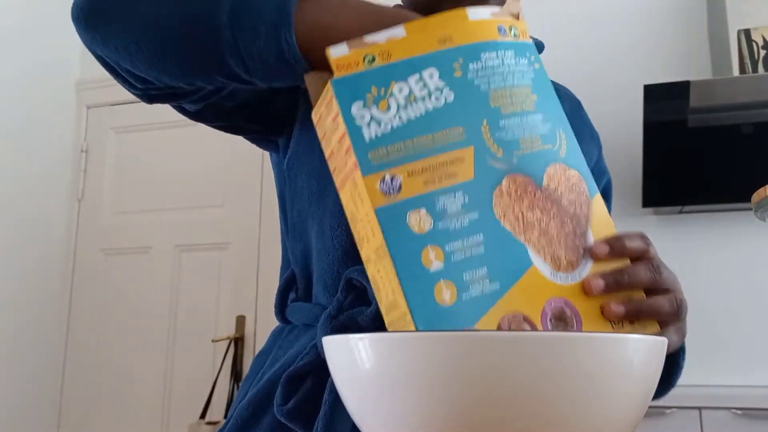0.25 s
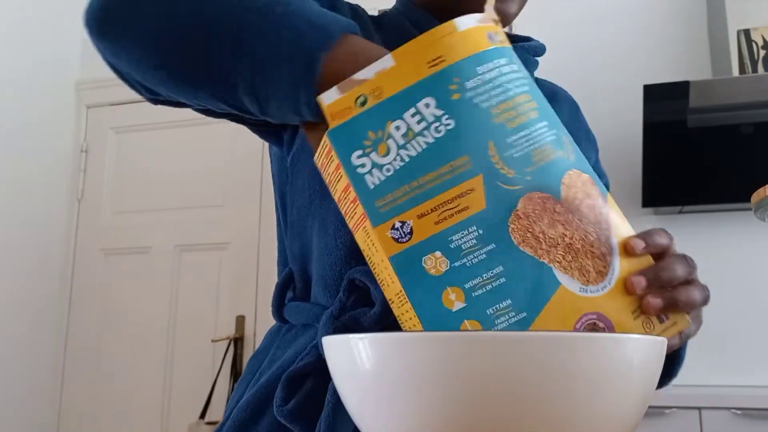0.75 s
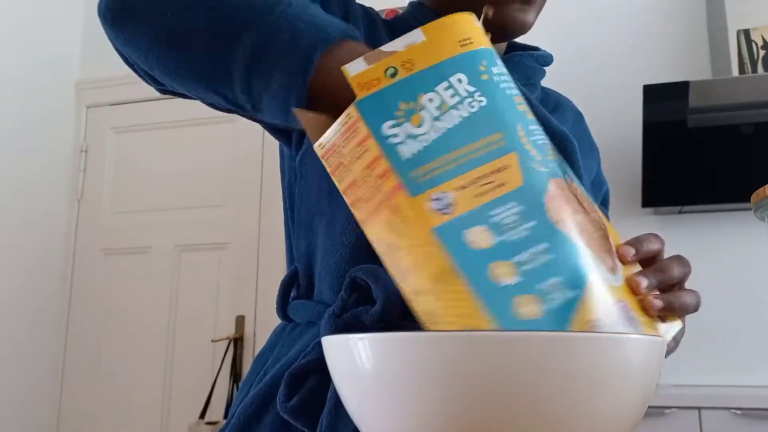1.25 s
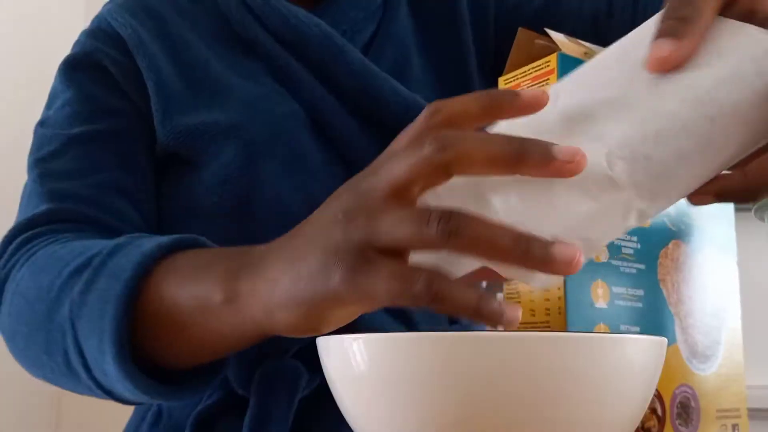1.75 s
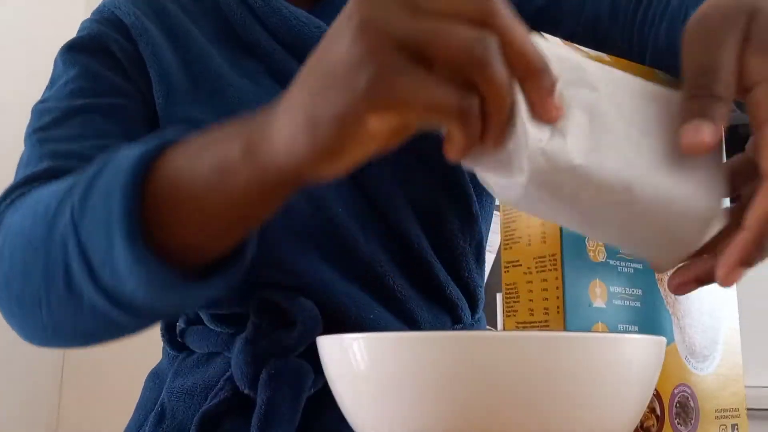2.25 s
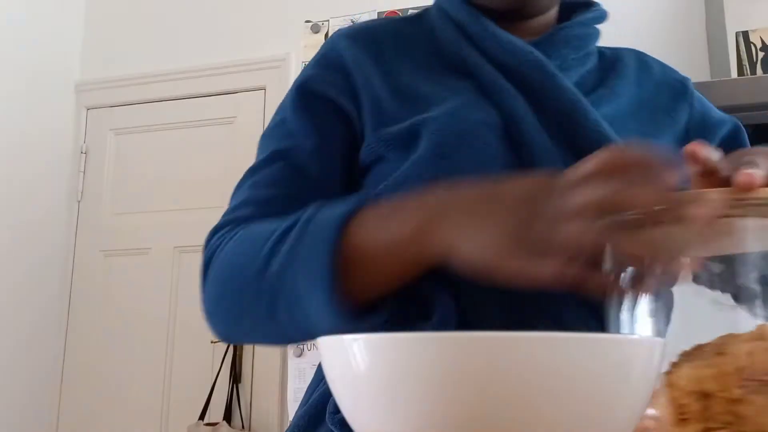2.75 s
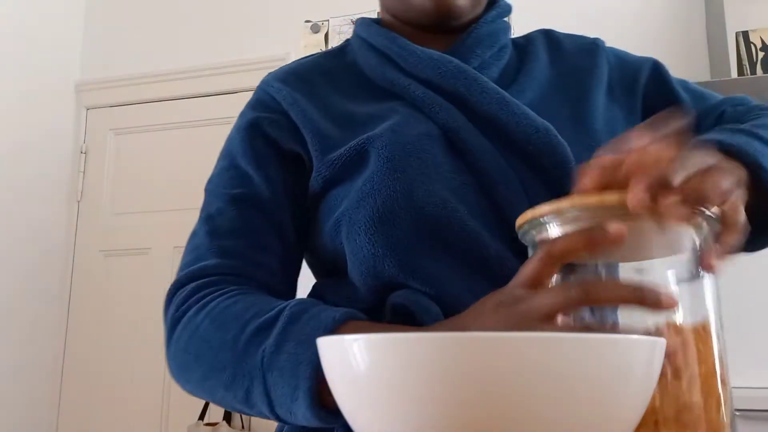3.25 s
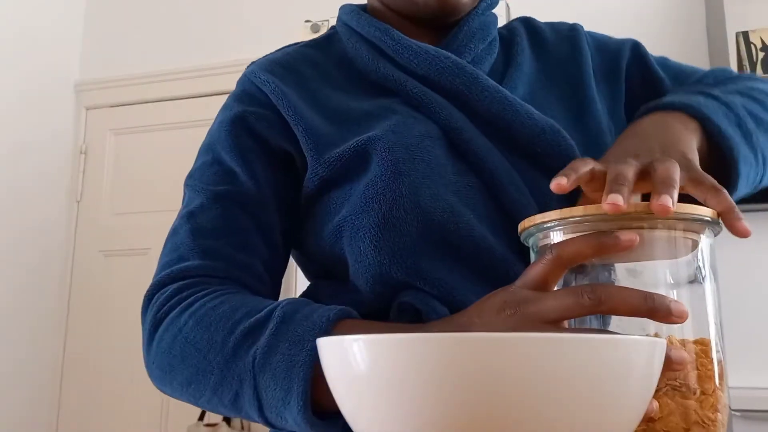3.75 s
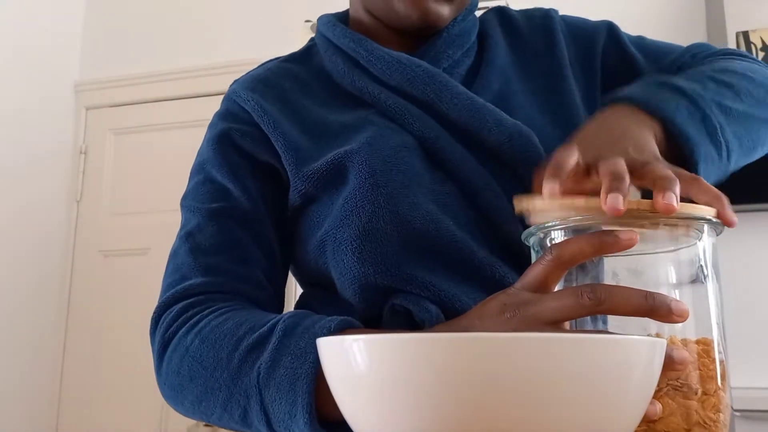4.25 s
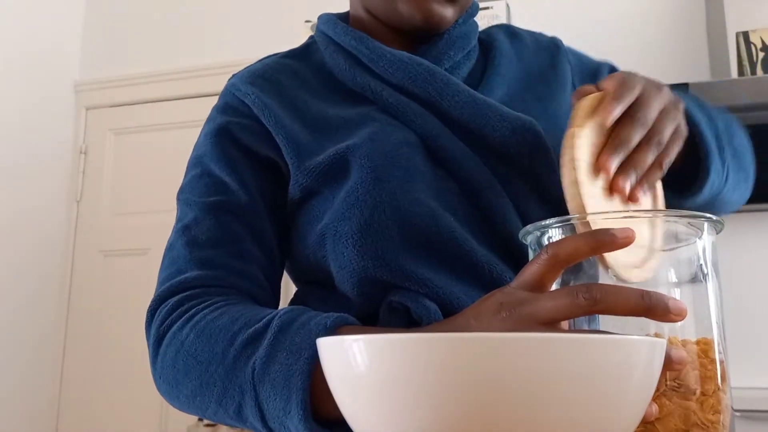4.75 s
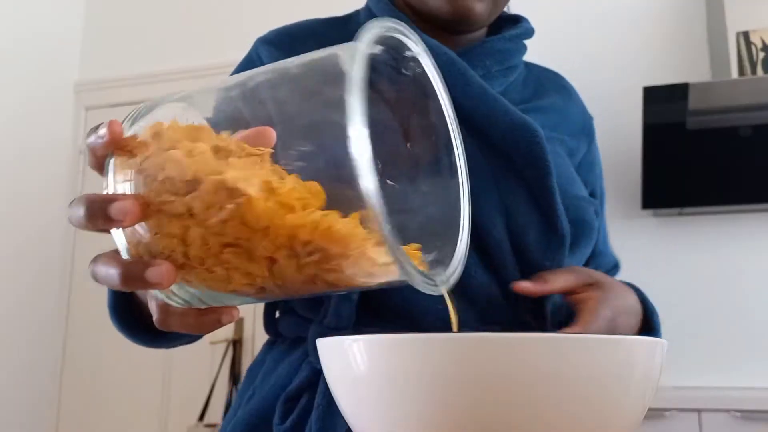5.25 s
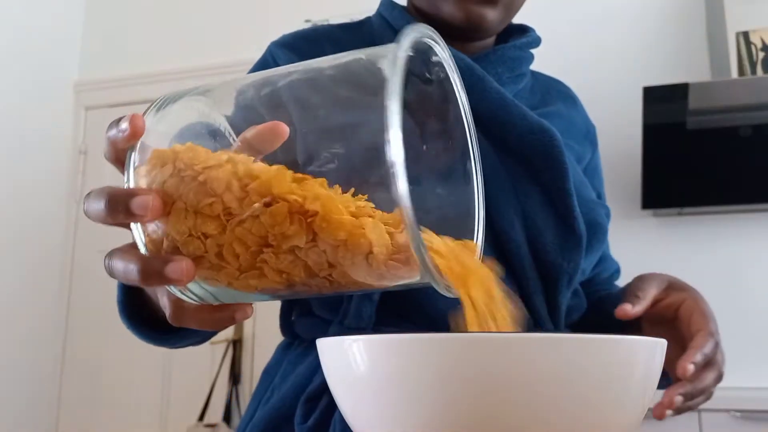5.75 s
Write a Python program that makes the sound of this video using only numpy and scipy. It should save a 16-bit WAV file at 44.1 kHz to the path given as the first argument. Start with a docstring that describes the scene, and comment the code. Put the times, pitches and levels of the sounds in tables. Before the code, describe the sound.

In an echoing kitchen, a hand rummages softly in a cardboard cereal box, with dull hollow bumps. A hard cut brings louder, sharp crackling of a paper wrapper. Another cut: a glass jar thuds and drags on the worktop, gets hard knocks, and its wooden lid pops off with a brief glassy ring. Finally dry flakes slide down the glass and patter into a ceramic bowl with faint clinks. Close stereo microphones.

```python
"""Breakfast sounds in an echoing kitchen

Four parts with hard cuts: a hand rummages in a cardboard cereal box; a paper wrapper crinkles;
a glass jar is slid and knocked on the worktop and its wooden lid pops off; dry flakes slide into a ceramic bowl.
Paper and flakes are clouds of random clicks through filters, knocks are short tone swells with noise slaps,
glass and bowl are struck resonators."""
import sys
import numpy as np
from scipy import signal
from scipy.fft import rfft, irfft, next_fast_len
from scipy.io import wavfile
from scipy.ndimage import uniform_filter1d

SR = 44100
rng = np.random.default_rng(int(sys.argv[2]) if len(sys.argv) > 2 else 0)


def transcribe(signal):
    """Save signal, clipped to [-1, 1], as a 16-bit WAV file at the path in sys.argv[1]."""
    frames = np.atleast_2d(signal).T
    limited = np.clip(frames, -1, 1)
    pcm = np.round(limited * 32767).astype(np.int16)
    wavfile.write(sys.argv[1], SR, pcm)


N = 265041

# the four parts: start_s, end_s
PARTS = [(0, 1.567), (1.58, 2.581), (2.581, 4.777), (4.797, 6.02)]
# single creases that crack: start_s, level_db
SNAPS = [(0.1045, -21), (0.1453, -23), (0.3548, -19), (0.395, -23.5), (1.3174, -17), (1.4697, -20.5),
         (1.669, -23), (1.7373, -19.5), (1.7907, -12), (1.8488, -10), (1.8733, -8.5), (1.901, -11),
         (1.9355, -18), (1.947, -18), (1.97, -19.5), (1.992, -18.5), (2.0339, -9.5), (2.064, -19.5),
         (2.0847, -13.5), (2.103, -14), (2.1176, -7.5), (2.1605, -10), (2.177, -16), (2.2064, -9),
         (2.222, -7.5), (2.2729, -13), (2.407, -8.5), (2.493, -20.5), (2.524, -24)]
# whole panels that buckle with a dull pop: start_s, level_db
POPS = [(0.4552, -21), (0.943, -25.5), (1.67, -20.5), (1.7384, -17), (2.289, -26.5), (2.367, -22)]
# dull blows on cardboard, worktop and lid: start_s, level_db, pitch_hz, contact_ms
KNOCKS = [(0.729, -21, 504, 2.5), (0.839, -9.5, 499, 1.53), (1.26, -9.5, 492, 1.18),
          (1.333, -11.5, 299, 3.1), (1.341, -10.5, 480, 1.2), (1.35, -11.5, 400, 1.25),
          (1.367, -18.5, 311, 3.2), (2.582, -13, 405, 0.9), (2.658, -25.5, 432, 3.5),
          (2.769, -27.5, 132, 5.6), (2.901, -35.5, 119, 7.8), (3.266, -6.5, 482, 1.4),
          (3.277, -12, 560, 0.76), (3.37, -3.5, 422, 1.96), (3.379, -2.5, 452, 0.85),
          (3.408, -1, 505, 0.98), (4.1, -26, 410, 2.9), (4.264, -7, 463, 1.46), (4.2759, -14.5, 457, 2.2),
          (4.539, -26, 500, 3.7), (4.585, -9.5, 473, 2.9), (4.598, -7, 500, 1.3), (4.6188, -6, 700, 0.46)]
# hard edge meeting the worktop: start_s, level_db
TICKS = [(3.266, -22)]
# rumble of the dragged jar and the lid worked loose: time_s, level_db
DRAG = [(2.58, -32), (2.75, -40), (3.02, -49.5), (3.12, -41.5), (3.22, -55), (3.28, -41), (3.42, -30.5),
        (3.55, -57.5), (4.2, -74), (4.28, -45), (4.52, -55), (4.62, -37.5), (4.78, -37.5)]
# brighter slips of the jar: start_s, hold_s, level_db
SCRAPES = [(3.09, 0.052, -67.5), (3.288, 0.04, -50.5), (3.37, .05, -55.5), (4.595, 0.014, -49)]
# air popping as the seal lets go: start_s, length_s, level_db, from_hz, to_hz
LID_POP = (4.551, .024, -13, 270, 640)
# hand in the box, as cardboard rustle: time_s, level_db
RUMMAGE = [(0, -43.5), (.08, -43.5), (.17, -38.5), (.22, -54), (.33, -49.5), (.37, -45.5), (.52, -30.5),
           (.57, -41.5), (.68, -33.5), (.82, -36.5), (.93, -42), (1.0, -37), (1.1, -43.5), (1.2, -36),
           (1.33, -33), (1.42, -34), (1.47, -33.5), (1.57, -46)]
# hands on the wrapper, as rustle: time_s, level_db
CRINKLE = [(1.58, -49), (1.77, -46.5), (1.86, -30.5), (1.92, -36), (2.0, -29.5), (2.12, -32.5), (2.22, -38),
           (2.3, -39.5), (2.45, -50), (2.58, -58)]
# crackle under a -40 dB rustle, and how far it follows the rustle: level_db, swing_share
BOX_CRACKLE = (-56, 0.83)
WRAPPER_CRACKLE = (-49, 0.94)
# flakes sliding along the glass: time_s, level_db
POUR = [(4.82, -40), (4.98, -46.5), (5.13, -49.5), (5.38, -45), (5.47, -41.5), (5.66, -37), (6.01, -41)]
# jar wall singing under the flakes: time_s, level_db
GLASS_HUM = [(4.8, -68), (5.39, -71), (5.47, -59), (6.0, -62)]
# flakes landing in the bowl: time_s, level_db
FALL = [(5.69, -51), (5.712, -39.5), (5.77, -35.5), (5.92, -39.5), (6.01, -50)]
# flakes striking bare ceramic: start_s, strike_db
CLINKS = [(5.70, -47), (5.768, -38), (5.872, -42), (5.915, -38.5), (5.962, -42)]

# spectrum shapes, only relative level counts: freq_hz, level_db_per_hz
BOX_SPECTRUM = [(50, -34.5), (130, -16.5), (280, -7), (523, -1.5), (900, -8), (2900, -17.5), (4200, -28),
                (8000, -31.5)]
WRAPPER_SPECTRUM = [(50, -29), (140, -15), (583, 0.5), (1000, -2.5), (2820, -9), (4000, -20), (8000, -59)]
CRACKLE_SPECTRUM = [(1470, -38), (2500, -6.5), (2920, -8), (4820, -10), (12000, -10), (15800, -13.5)]
WORKTOP_SPECTRUM = [(50, -27.5), (118, -12), (187, -10), (456, -4), (688, -23), (1600, -32.5), (3000, -47)]
SCRAPE_SPECTRUM = [(880, -42.5), (1500, -5.5), (2740, -9), (3710, -4.5), (4180, -5.5), (15800, -22.5)]
FLAKE_SPECTRUM = [(800, -53), (1700, -24.5), (2750, -7), (3300, -12.5), (5900, -14.5), (12100, -2),
                  (15800, -5.5)]
LANDING_SPECTRUM = [(150, -22), (350, -11.5), (700, -14), (1500, -7.5), (3000, -4.5), (5000, -12)]
AIR_SPECTRUM = [(50, -27.5), (100, 2.5), (190, 0.5), (450, -3), (700, -22), (1000, -14), (16000, -56.5)]
# push of wood on glass: freq_hz, level_db_per_hz
RIM_SPECTRUM = [(20, -7.5), (1500, -10), (3200, -9.5), (6000, -55)]
# noisy slap of a hard contact: freq_hz, level_db_per_hz
SLAP_SPECTRUM = [(100, -7), (300, 5), (1000, -6.5), (2200, -29.5), (4500, -56)]

# ringing modes: freq_hz, level_db, t60_s
JAR_MODES = [(1013, -18, 0.1), (2417, -29, 0.045), (3750, -37, .05), (6200, -43.5, 0.03),
             (7480, -42.5, 0.046), (9900, -39, 0.048)]
BOWL_MODES = [(850, -11, .15), (2176, 0, .4), (3940, -12, .4)]
# reverberation of the room: freq_hz, t60_s
KITCHEN_T60 = [(250, 0.67), (700, 0.85), (2000, 0.66), (5000, 0.62), (12000, 0.43)]
# microphone pair: freq_hz, colour_db, extra_width_db
MIC = [(280, -0.48, -1.5), (1190, 1.84, 0.5), (4300, -2, 5.5), (8400, -2, 3.5), (12500, 0.7, -0.5)]

AIR_DB = -67
SNAP_BODY_DB = -9.5   # the body's answer, relative to the crack
SLAP_DB = -8.5   # relative to the knock, at 1 ms contact
LID_LOOSE_S = 4.555
RING_SHUT_DB, RING_OPEN_DB = -24, -4.5   # glass relative to a 1 ms blow, lid seated and loose
DRAG_HISS_DB = -33.5   # faint scrape relative to the rumble
SCRAPE_RISE_DB_PER_S, SCRAPE_FALL_DB_PER_S = 406, 177.5
SING_DB, SING_FADE_DB_PER_S = -69, 22   # high glass modes from the first slide, fading
NEAR_DB, NEAR_DECAY_S, NEAR_SHIFT_S = -7, 0.0033, 0.06   # close bounces; time between patterns
CUTOFF_HZ = 16984


def amp(db):
    """dB to gain."""
    return 10 ** (np.asarray(db) / 20)


def rms_one(x):
    """Scales to rms 1."""
    return x / np.sqrt(np.mean(x ** 2) + 1e-20)


def levels(rows):
    """Gain curve over time from a time_s, level_db table."""
    time_s, level_db = np.transpose(rows)
    return amp(np.interp(np.arange(N) / SR, time_s, level_db))


def rows_between(table, start_s, end_s):
    """Table rows whose first column lies in the span."""
    return [row for row in table if start_s <= row[0] < end_s]


def at_hz(points, hz):
    """Reads a table on a log-frequency axis."""
    points = np.array(points)
    return np.interp(np.log(hz + 1), np.log(points[:, 0]), points[:, 1])


def fold(x, response):
    """Convolution, cut to length."""
    return signal.oaconvolve(np.atleast_2d(x), np.atleast_2d(response), axes=1)[:, :N]


def pulse(spectrum):
    """Minimum-phase impulse response of a spectrum, energy 1, by folding its cepstrum."""
    log_gain = at_hz(spectrum, np.fft.rfftfreq(4096, 1 / SR)) * np.log(10) / 20
    cepstrum = irfft(log_gain)
    cepstrum[1:2048] *= 2
    response = irfft(np.exp(rfft(cepstrum[:2049], 4096)))[:2048]
    return response / np.sqrt(np.sum(response ** 2))


def ring(clicks, modes):
    """Clicks excite two-pole resonators, one per mode, each dying by its t60."""
    out = 0
    for hz, db, t60_s in modes:
        r = amp(-60 / (t60_s * SR))
        w = 2 * np.pi * hz / SR
        gain = amp(db) * np.sin(w)
        out = out + signal.lfilter([0, gain], [1, -2 * r * np.cos(w), r * r], clicks + 1e-18)
    return out


def clicks_at(times_s, db):
    """Single clicks at given times."""
    out = np.zeros(N)
    out[np.round(np.asarray(times_s) * SR).astype(int)] = amp(db)
    return out


def grains(per_s, spread_db, clump_db, width):
    """Stereo random clicks, uneven in size and clumped, each with its own left-right balance; rms 1."""
    drift = rms_one(uniform_filter1d(rng.standard_normal(N), size=400))
    clumps = amp(clump_db * 2 * np.tanh(0.5 * drift))
    sizes = amp(spread_db * np.minimum(rng.exponential(1, N), 4)) * rng.choice([-1, 1], N)
    clicks = sizes * clumps * (rng.random(N) < per_s / SR)
    return rms_one(clicks * (1 + width * rng.uniform(-0.82, 1, (2, N))))


def blows(times_s, peak_db, spectrum, rough_s):
    """Noise bursts of random brightness and balance through a body, scaled to peak before panning."""
    out = np.zeros((2, N + 4000))
    t = np.arange(900) / SR
    body = pulse(spectrum)
    envelope = np.sqrt(t) * np.exp(-t / rough_s)
    for s, db, noise in zip(times_s, peak_db, rng.standard_normal((len(times_s), 901))):
        pole = 0.56 * np.tanh(noise[-1])
        burst = signal.lfilter([1], [1, pole], noise[:-1] ** 3) * envelope
        hit = signal.fftconvolve(burst, body)
        pan_db = 2.5 * noise[0] * np.array([[1], [-1]])
        out[:, round(s * SR):][:, :len(hit)] += amp(db + pan_db) * hit / np.abs(hit).max()
    return out[:, :N]


def room_air():
    """Steady stereo noise shaped as the room's air."""
    return amp(AIR_DB) * fold(rng.standard_normal((2, N)), pulse(AIR_SPECTRUM))


def bounces(mono):
    """Close echoes off worktop, bowl and hands; six patterns a side crossfade in turn as things move."""
    near = rng.standard_normal((6, 2, 900)) * np.exp(-np.arange(900) / SR / NEAR_DECAY_S)
    near = signal.sosfilt(signal.butter(2, [700., 8000.], "band", fs=SR, output="sos"), near)
    turn = np.arange(N) / SR / NEAR_SHIFT_S
    out = 0
    for k, pattern in enumerate(near):
        weight = np.sqrt(np.clip(1 - np.abs((turn - k + 3) % 6 - 3), 0, 1))
        out = out + fold(weight * mono, pattern / np.sqrt(np.sum(pattern ** 2) / 2))
    return amp(NEAR_DB) * out


def kitchen(x, wet_db):
    """Adds close bounces and a room tail: octave noise with its own t60s, alike left and right in the bass."""
    t = np.arange(SR) / SR
    tail = 0
    white = rng.standard_normal((3, SR))
    for hz in 45 * 2. ** np.arange(9):
        octave = signal.butter(2, [hz / np.sqrt(2), hz * np.sqrt(2)], "band", fs=SR, output="sos")
        bands = signal.sosfilt(octave, white)
        apart = np.clip(hz / 820.0, 0, 1)
        stereo = np.sqrt(1 - apart) * bands[2] + np.sqrt(apart) * bands[:2]
        tail = tail + stereo * amp(-60 * t / at_hz(KITCHEN_T60, hz))
    tail *= np.clip(t / 0.00703 - 0.3, 0, 1)   # the first echoes take a few ms
    mono = x.mean(axis=0)
    return x + bounces(mono) + amp(wet_db) * fold(mono, tail / np.sqrt(np.sum(tail ** 2) / 2))


def thuds(start_s, end_s):
    """A soft contact swells and fades a few cycles of the body's pitch; harder ones slap louder."""
    out = np.zeros(N + 4000)
    t = np.arange(4000) / SR
    rows = np.reshape(rows_between(KNOCKS, start_s, end_s), (-1, 4))
    for s, db, hz, ms in rows:
        age = t / (ms / 1000)
        turn = 2 * np.pi * hz * t
        swell = np.tanh(2 * age) * age * np.exp(1 - age)
        overtone = 0.29 / ms * np.exp(-0.6 * age) * np.sin(1.6 * turn)
        boom = 0.21 * np.sin(0.5 * turn)   # the slab or panel underneath
        out[round(s * SR):][:4000] += amp(db) * swell * (np.sin(turn) + overtone + boom)
    slap_db = rows[:, 1] + SLAP_DB - 14 * np.log10(rows[:, 3])
    slaps = blows(rows[:, 0], slap_db, SLAP_SPECTRUM, 0.006)
    return signal.sosfilt(signal.butter(2, 70., "high", fs=SR, output="sos"), out[:N] + slaps)


def flakes():
    """Many tiny flake contacts hiss and stir the glass; those that land crunch and ring the bowl."""
    slip = grains(14000., 2.2, 0.7, 0.7)
    fall = levels(FALL) * grains(2200., 2.8, 1.6, 0.6)
    hiss = levels(POUR) * fold(slip, pulse(FLAKE_SPECTRUM)) * amp([[1.5], [-1.5]])
    hum = levels(GLASS_HUM) * rms_one(ring(slip, JAR_MODES))
    crunch = fold(fall, pulse(LANDING_SPECTRUM))
    crunch = crunch + amp(2.0) * fold(fall, pulse(FLAKE_SPECTRUM)) * amp([[2.5], [-2.5]])
    big_flake = blows([5.737], [-21], LANDING_SPECTRUM, 0.001)
    strikes = amp(-60) * fall + clicks_at(*np.transpose(CLINKS))
    return kitchen(hiss + hum + crunch + big_flake, wet_db=-8.0) + ring(strikes, BOWL_MODES)


def lid_pop():
    """One short swell whose pitch climbs as the gap opens."""
    start_s, length_s, db, from_hz, to_hz = LID_POP
    part = np.clip((np.arange(N) / SR - start_s) / length_s, 0, 1)
    phase = 2 * np.pi * np.cumsum(from_hz + (to_hz - from_hz) * part) / SR
    return amp(db) * np.sin(np.pi * part) * np.sin(phase)


def glass_ring():
    """Knocks ring the jar's modes: more for short contacts and once the lid is loose."""
    s, db, _, ms = np.transpose([row for row in KNOCKS if row[0] > PARTS[2][0]])
    glass_db = db + np.where(s < LID_LOOSE_S, RING_SHUT_DB, RING_OPEN_DB) - 18 * np.log10(ms)
    return ring(fold(clicks_at(s, glass_db), pulse(RIM_SPECTRUM)), JAR_MODES)


def jar_drag():
    """Friction clicks rumble the worktop, scrape brightly and make the glass sing."""
    t = np.arange(N) / SR
    rumble = levels(DRAG)
    scrape = amp(DRAG_HISS_DB) * rumble
    for at_s, hold_s, db in SCRAPES:
        rise_db = SCRAPE_RISE_DB_PER_S * np.maximum(at_s - t, 0)
        fall_db = SCRAPE_FALL_DB_PER_S * np.maximum(t - at_s - hold_s, 0)
        scrape = scrape + amp(db - rise_db - fall_db)
    rub = grains(8200.0, 1.3, 0.83, 0.526)
    drag = rumble * fold(grains(1500., 2.5, 2.0, 0.3), pulse(WORKTOP_SPECTRUM))
    drag += scrape * (fold(rub, pulse(SCRAPE_SPECTRUM)) + amp(-9.5) * rms_one(ring(rub, JAR_MODES[2:5])))
    # the loose lid rubs the rim
    drag += amp(1.0) * rumble * (t > LID_LOOSE_S) * rms_one(ring(rub, JAR_MODES[:2]))
    sing = amp(SING_DB - SING_FADE_DB_PER_S * np.abs(t - PARTS[2][0]))
    return drag + sing * rms_one(ring(rub, JAR_MODES[3:]))


def jar():
    """Dull knocks with a hard tick, glass ring, dragging and the lid's pop, all in the room."""
    ticks = blows(*np.transpose(TICKS), SCRAPE_SPECTRUM, 0.0046)
    return kitchen(thuds(*PARTS[2]) + lid_pop() + ticks + glass_ring() + jar_drag(), wet_db=-4.5)


def paper(handling, crackle, body, start_s, end_s, wet_db):
    """Dense creases rustle the body and crackle, facets blip at set pitches, loud creases snap, panels pop."""
    rustle = levels(handling)
    crackle_db, share = crackle
    creases = grains(1500., 3.6, 4.0, 0.8)
    low = rustle * fold(creases + 0.48 * grains(1500., 0.87, 2.5, 0.12), pulse(body))
    facets = 0
    for hz in np.geomspace(600., 3200., num=7):
        facets = facets + ring(grains(30., 4.9, 4.5, 0.8), [(hz, 0, 14. / hz)])
    low += amp(-6) * rustle * rms_one(facets)
    fine = 1.8 * grains(6500.0, 4.0, 3.4, 0.12) - creases
    high = amp(crackle_db) * (100 * rustle) ** share * fold(fine, pulse(CRACKLE_SPECTRUM))
    snap_s, snap_db = np.transpose(rows_between(SNAPS, start_s, end_s))
    snaps = blows(snap_s, snap_db + SNAP_BODY_DB, body, 0.002)
    snaps += blows(snap_s, snap_db, CRACKLE_SPECTRUM, 0.0013)
    pops = blows(*np.transpose(rows_between(POPS, start_s, end_s)), body, 0.002)
    return kitchen(low + high * amp([[1.5], [-1.5]]) + snaps + pops + thuds(start_s, end_s), wet_db)


def scene():
    """Each part sounds only between its cuts, over the room's air."""
    air = room_air()
    box = paper(RUMMAGE, BOX_CRACKLE, BOX_SPECTRUM, *PARTS[0], wet_db=-8.5)
    wrapper = paper(CRINKLE, WRAPPER_CRACKLE, WRAPPER_SPECTRUM, *PARTS[1], wet_db=-16.5)
    t = np.arange(N) / SR
    out = 0
    for sound, (start_s, end_s) in zip([box, wrapper, jar(), flakes()], PARTS):
        gate = np.clip(np.minimum(t - start_s, end_s - t) / 0.0005 + 0.5, 0, 1)
        out = out + (sound + air) * gate
    return out


def record(dry):
    """The microphone pair colours and widens, loses deep bass, steps down at the top, then the band ends."""
    size = next_fast_len(N + 4096)
    table = np.array(MIC)
    hz = np.fft.rfftfreq(size, 1 / SR)
    mid, side = rfft([dry[0] + dry[1], dry[0] - dry[1]], size) / 2 * amp(at_hz(table, hz))
    side = side * amp(at_hz(table[:, ::2], hz))   # freq_hz, extra_width_db
    dry = irfft([mid + side, mid - side], size)[:, :N]
    dry = signal.sosfilt(signal.butter(3, 55., "high", fs=SR, output="sos"), dry)
    shelf = signal.sosfilt(signal.ellip(8, 0.5, 36, 15700, fs=SR, output="sos"), dry)
    return signal.sosfilt(signal.ellip(10, 0.5, 70, CUTOFF_HZ, fs=SR, output="sos"), shelf)


dry = scene()
out = record(dry)
transcribe(out)
```